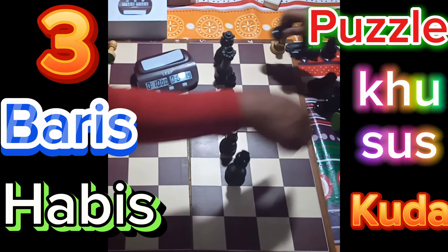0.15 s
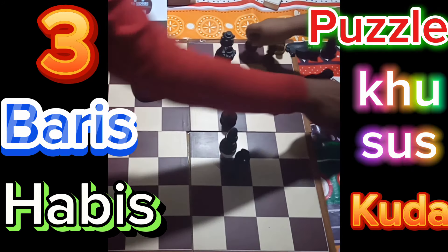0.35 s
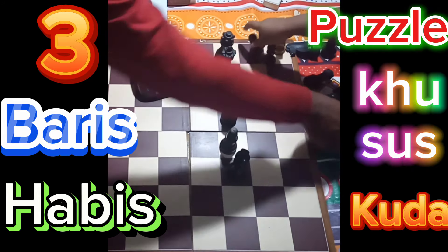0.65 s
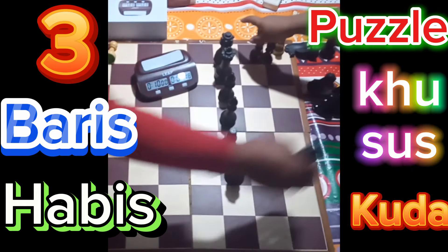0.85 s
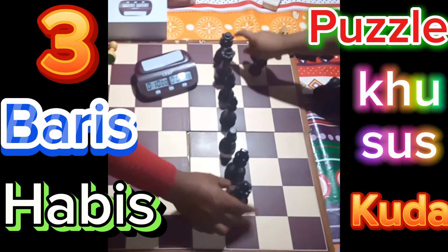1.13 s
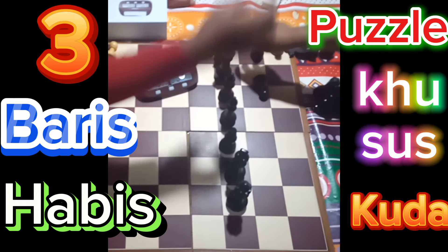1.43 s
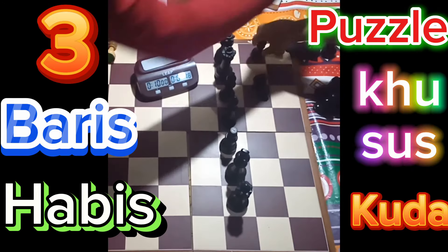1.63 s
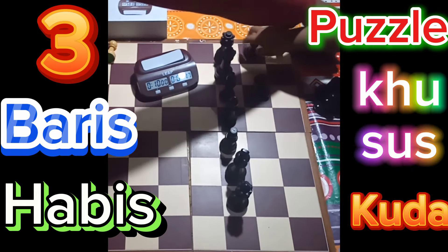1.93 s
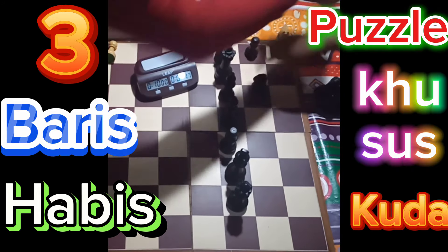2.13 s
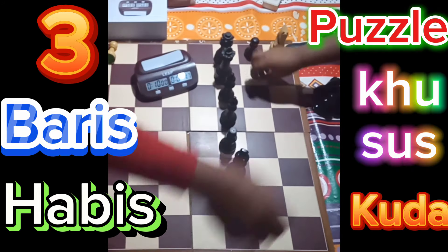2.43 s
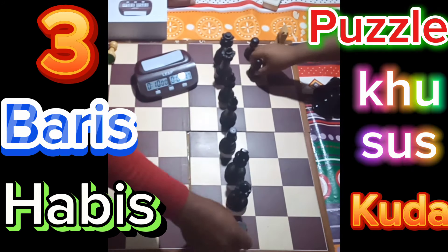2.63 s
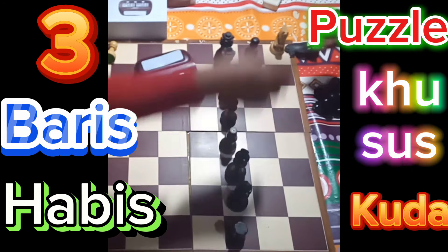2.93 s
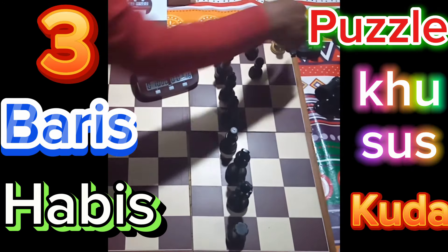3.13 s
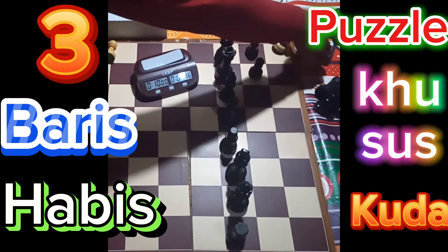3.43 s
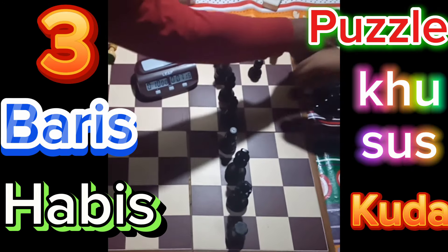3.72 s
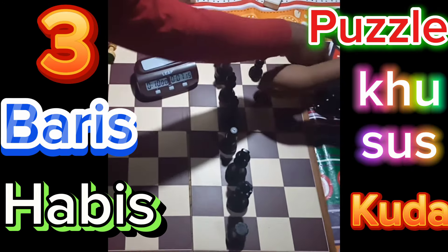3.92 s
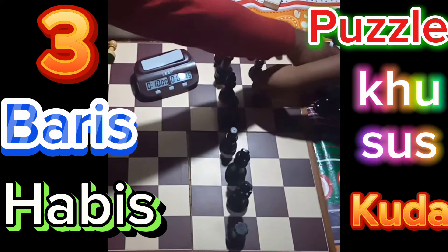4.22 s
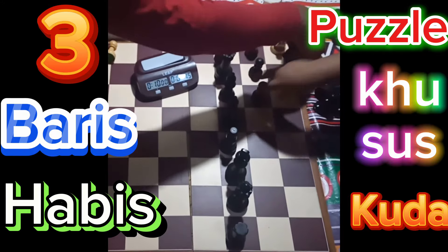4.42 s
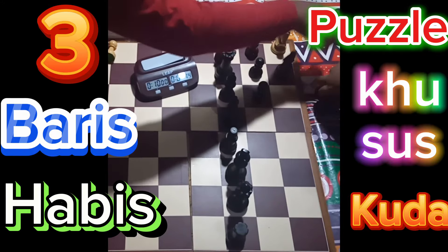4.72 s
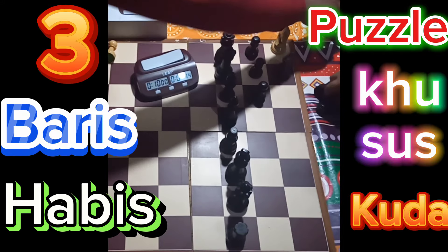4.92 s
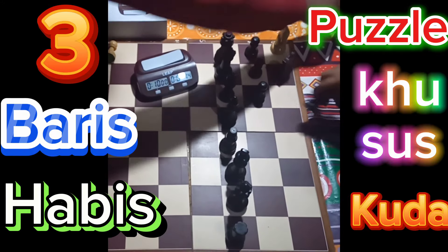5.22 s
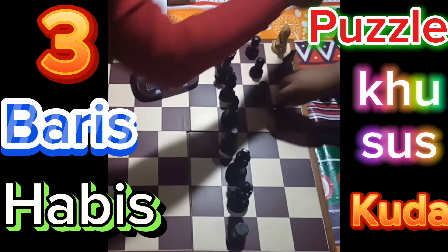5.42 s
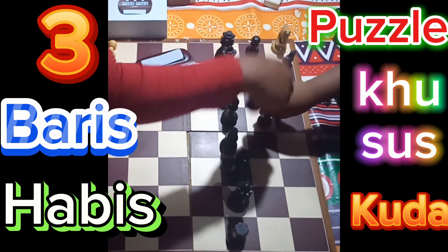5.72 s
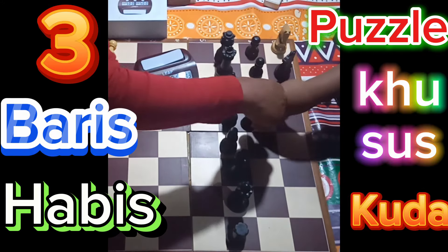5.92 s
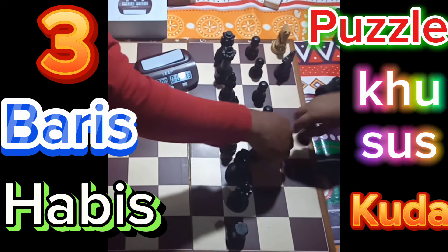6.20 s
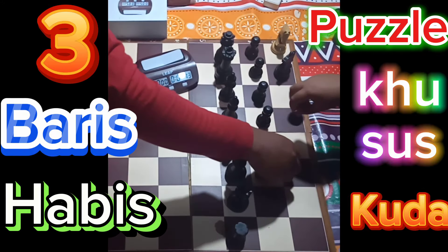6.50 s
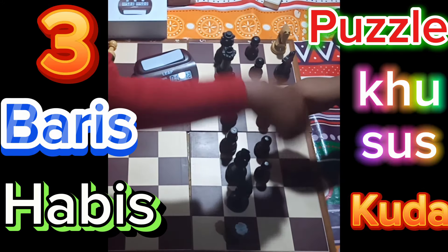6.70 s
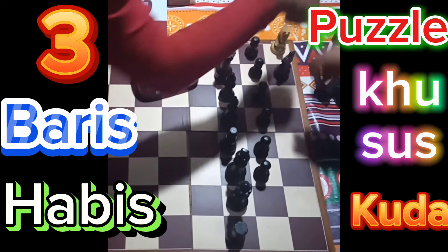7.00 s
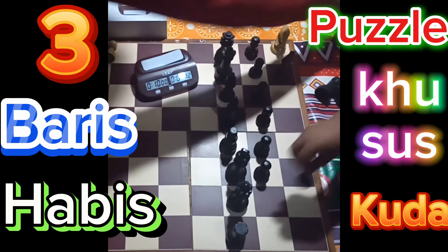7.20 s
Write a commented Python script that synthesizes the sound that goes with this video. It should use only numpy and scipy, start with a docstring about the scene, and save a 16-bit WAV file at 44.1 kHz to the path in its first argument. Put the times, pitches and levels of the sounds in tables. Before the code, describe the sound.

A rapid game of chess in a small room: hard wooden knocks with bright cracks, bunches of lighter taps, and pieces clicking together. The loudest blows clip the close microphone. Grainy rubbing of sleeves and sliding pieces slips between. Late on, a piece wobbles quickly to a stop, then only a few soft knocks and a longer brush remain, above faint cricket chirps and thin hiss.

```python
"""From the start, wooden chess pieces are set down on a board in quick turns, the first with a low thud of the
table. Knocks and clicks are ringing wood plus a noisy crack, each answered by a small room; the hardest blows
clip. A cricket trills faintly all along in falling chirps, over steady noise and the thin high hiss of another
insect. From half a second on, sleeves and sliding pieces brush past as grainy noise. After five seconds a piece
rocks to rest; then come a few softer knocks and, near the end, the longest brush."""
import sys
import numpy as np
from scipy import signal
from scipy.fft import rfft, irfft, next_fast_len
from scipy.io import wavfile
from scipy.ndimage import uniform_filter1d

SR = 44100
rng = np.random.default_rng(int(sys.argv[2]) if len(sys.argv) > 2 else 0)


def store_wav(level_fs):
    """Save 16-bit WAV to argv[1]."""
    pcm = np.round(np.clip(np.atleast_2d(level_fs), -1, 1) * 32767)
    wavfile.write(sys.argv[1], SR, pcm.T.astype(np.int16))


N = 324135


def amp(db):
    """Turn decibels into an amplitude factor."""
    return 10 ** (np.asarray(db) / 20)


def unit(x):
    """Scale a sound to rms 1."""
    return x / np.sqrt(np.mean(x ** 2) + 1e-20)


def along(points, hz):
    """Read a curve of (Hz, value) points, joined by straight lines on a log frequency axis."""
    point_hz, values = np.transpose(points)
    return np.interp(np.log(hz + 1), np.log(point_hz + 1), values)


def filtered(x, response):
    """Multiply the spectrum of x by a function of frequency."""
    size = next_fast_len(len(x) + SR // 4)
    gains = response(np.fft.rfftfreq(size, 1 / SR))
    return irfft(rfft(x, size) * gains, size)[:len(x)]


def noise(spectrum, size):
    """Make random noise with a given colour and rms 1."""
    return unit(filtered(rng.standard_normal(size), lambda hz: amp(along(spectrum, hz))))


def coloured(x, points, size=8192):
    """Colour a sound with a minimum-phase filter, so that nothing sounds before the blow."""
    cepstrum = irfft(np.log(amp(along(points, np.fft.rfftfreq(size, 1 / SR)))))
    # folding the cepstrum onto positive times makes the filter causal
    cepstrum[1:size // 2] *= 2
    cepstrum[size // 2 + 1:] = 0
    return irfft(rfft(x, size) * np.exp(rfft(cepstrum)))[:len(x)]


def add(track, start_s, sound):
    """Mix a sound into the track from a given second on."""
    i = int(np.clip(round(start_s * SR), 0, len(track)))
    track[i:i + len(sound)] += sound[:len(track) - i]


# What the walls hear of the board. Each row: frequency in Hz, colour in dB.
TOWARD_WALLS = [(200, -4), (650, -7), (1300, -9), (3000, -7), (8000, -5.5)]
# Pieces set down on the board; one dropped flat starts at once, one rolled into contact rises slowly.
# Each row: start in seconds, level at the pitch in dB before snap and room, pitch in Hz,
# snap of the rim in dB against that level, rise time constant in seconds, room answer in dB.
KNOCKS = [(.026,-19.5,754,-17,.0002,1), (.0327,-17,1287,-20,0.00037,-6.5), (.1858,-48,890,-25,0.00033,0),
          (.497,-37.5,595,-14,0.0027,1.5), (.7059,-17.5,890,-30,0.00044,-1.5),
          (1.0927,-11,1030,-22,0.00049,-1.5), (1.2399,-9.5,734,-26,0.00056,-0.5),
          (1.4241,-28.5,660,-22,.0003,8.5), (1.4324,-11.5,1570,-16,0.00013,0),
          (1.991,-44,650,-4.5,.003,-12), (2.002,-41.5,840,-24,0.0011,-18),
          (2.0768,-34.5,970,-9.5,.0004,-0.5), (2.2006,-28.5,960,-10.5,0.00028,-3.5),
          (2.246,-35.5,970,-12,.0003,2), (2.2923,-22.5,627,-24,0.0017,-1), (2.3229,-29,1090,-7,0.00035,4),
          (2.353,-30,960,-11,0.0015,-4), (2.6286,-26,575,-34,0.00036,-15),
          (2.6403,-11.5,1490,-6.5,0.00032,0), (3.4057,-39.5,870,-7,0.0026,1.5),
          (3.794,-12.5,1320,-13,0.00046,-5), (3.814,-20.5,693,-21,0.0018,1.5),
          (3.8622,-27.5,704,-15,.0015,6), (3.8828,-21.5,1080,-14,0.00044,-3.5),
          (3.905,-24.5,1080,-11.5,0.00033,-2), (3.939,-30.5,770,-17,.0016,-12),
          (4.0098,-25,875,-11,0.00067,-1.5), (4.1165,-45,586,-10,.003,-4),
          (4.1517,-38.5,890,-10.5,.0003,5.5), (4.21,-40,700,-14,0.00028,2),
          (4.2142,-22.5,786,-15,0.00034,-2.5), (4.6091,-12.5,1168,-25.5,0.00034,-2.5),
          (4.76,-35.5,635,-17,0.002,-6), (4.9648,-21.5,930,-25.5,0.00035,0), (5.098,-37,560,-10,0.001,-5),
          (5.153,-45,1390,-7,0.00032,1), (5.191,-46.5,1190,6.5,0.00045,0), (6.281,-29,790,-18,0.00033,1),
          (6.54,-38,490,-23,.0016,2), (6.5735,-45,520,-28,.0015,-15), (6.864,-44.5,433,-23,0.0004,-9)]
# One piece clicks against another. Each row: start in seconds, level in dB as for the knocks, pitch in Hz.
CLICKS = [(.0095, -35.5, 4100), (.0687, -41.5, 4800), (.527, -50, 5500), (.626, -46, 2360),
          (1.134, -39.5, 2870), (2.513, -41, 4500), (2.537, -53, 4880), (3.323, -47.5, 3400),
          (3.787, -27.5, 3860), (3.7941, -16, 4230), (3.814, -38, 6000), (4.8398, -48.5, 2580),
          (5.062, -41, 2080), (5.069, -39, 7700), (5.127, -44, 5400), (5.134, -46, 7600),
          (5.166, -43.5, 3280), (5.826, -45.5, 3140), (5.835, -48.5, 2620)]


def pieces():
    """Knocks, clicks and rocking all ring the same wood; every contact has its own room answer."""
    track = np.zeros(N)
    click_snap_db, click_rise_s, click_room_db = -10.5, 0.00023, -2.5
    clicks = [(*row, click_snap_db, click_rise_s, click_room_db) for row in CLICKS]
    for start_s, db, pitch_hz, snap_db, rise_s, room_db in [*KNOCKS, *clicks, *rocking(count=6)]:
        levels = contact_colour(db, pitch_hz, snap_db)
        blow = clack(pitch_hz, rise_s, levels, ring_db=7, ring_t60=0.03,
                     crack_db=23.0, crack_t60=0.0047, crowd_db=19.5, crowd_t60=0.032, scatter_db=1.0)
        add(track, start_s, blow)
        thrown = coloured(blow, TOWARD_WALLS)
        answer = signal.fftconvolve(thrown, room(wall_s=0.0138, near_share=0.72))
        same_energy = answer * np.linalg.norm(thrown) / np.linalg.norm(answer)
        add(track, start_s, amp(room_db) * same_energy)
    return track


def rocking(count):
    """A released piece rocks on its base, each swing shorter, softer and duller than the last."""
    start_s, first_gap_s, shrink = 5.1991, 0.0838, 0.87
    first_db, loss_db = -32.5, 3  # level, and its loss at each contact
    first_hz, sag = 975, 0.88  # pitch, and its factor at each contact
    snap_db, rise_s, room_db = -18, 0.0018, -7
    contacts = []
    for k in range(count):
        elapsed_s = first_gap_s * (1 - shrink ** k) / (1 - shrink)  # sum of the shrinking gaps
        contacts.append((start_s + elapsed_s, first_db - loss_db * k, first_hz * sag ** k,
                         snap_db, rise_s, room_db))
    return contacts


# Edges of the bands in which a blow takes its colour. Each entry: frequency in Hz.
BAND_EDGES = [100, 450, 900, 1700, 2700, 4200, 9000, 16000]
BAND_CENTRES = np.sqrt(np.multiply(BAND_EDGES[1:], BAND_EDGES[:-1]))
# Hard contact of the rim. Each row: frequency in Hz, colour in dB.
SNAP = [(210, -18), (640, -5), (1240, -11), (2140, -4.5), (3400, -3.5), (6100, -7.5), (12000, -14)]


def contact_colour(db, pitch_hz, snap_db):
    """A blow is strongest in a woody hump around its pitch, plus the snap of the rim: dB in each band."""
    bass_slope, treble_slope = 2.96, 4.51  # falls of the hump, as powers of frequency
    below = (pitch_hz / BAND_CENTRES) ** bass_slope
    above = (BAND_CENTRES / pitch_hz) ** treble_slope
    hump = 2 / (below + above)
    snap = amp(snap_db + along(SNAP, BAND_CENTRES)) ** 2
    return db + 10 * np.log10(hump + snap)


def attack_levels(x, size=2048):
    """Find the level in dB of each band over the first 8 ms of a blow."""
    n = SR // 125
    fade = np.minimum(1, np.linspace(4, 0, n))  # fades over the last quarter
    power = abs(rfft(x[:n] * fade, size)) ** 2 * 2 / (size * n)
    band_power = np.add.reduceat(power, np.array(BAND_EDGES) * size // SR)[:-1]
    return 10 * np.log10(band_power + 1e-12)


# Resonances of board and pieces, before the blow is coloured.
# Each row: frequency in Hz, strength in dB, time to fall by 60 dB in seconds.
WOOD = [(178.5, -9.5, 0.032), (320.5, -3.5, 0.032), (523, -14.5, 0.023), (615, 0, 0.023),
        (698, -2.5, 0.032), (828, -10, 0.044), (960, -3, 0.016), (1083, -7, 0.079), (1120, 2, 0.0099),
        (1408, 2.5, 0.034), (1650, -30, 0.19), (1740, -3, 0.052), (2038, -2, 0.019), (2323, -10.5, 0.043),
        (3080, -20, 0.11), (4000, -8, 0.022)]
# The crack of contact and the crowd of small resonances after it, before the blow is coloured.
# Each row: frequency in Hz, colour in dB.
CRACK = [(50, -16.5), (150, -19.5), (400, -7), (1200, 4.5), (2200, -7), (3200, -7.5), (4100, -12.5),
         (4800, -15.5), (6400, -15), (7300, -13.5), (8600, -25.5), (10500, -37.5), (16000, -42.5)]


def clack(ring_hz, rise_s, levels, ring_db, ring_t60, crack_db, crack_t60, crowd_db, crowd_t60, scatter_db):
    """The spot that is struck favours one resonance; the hardness of the contact sets the colour."""
    t = np.arange(SR // 10) / SR
    hz, db, t60 = np.transpose(WOOD)[:, :, None]
    strength = amp(db + scatter_db * rng.standard_normal(hz.shape)) * rng.choice([-1, 1], hz.shape)
    detune = 1 + 0.021 * rng.standard_normal(hz.shape)  # no two blows ring quite alike
    ring = np.sum(strength * np.sin(2 * np.pi * hz * detune * t) * amp(-60 * t / t60), axis=0)
    favoured_db = ring_db + along([row[:2] for row in WOOD], ring_hz)
    ring += amp(favoured_db - 60 * t / ring_t60) * np.sin(2 * np.pi * ring_hz * t)
    crack = amp(crack_db - 60 * t / crack_t60)
    crowd = amp(crowd_db - 60 * t / crowd_t60)
    blow = ring + coloured(rng.standard_normal(len(t)) * (crack + crowd), CRACK)
    # a rocking base rolls into contact, a dropped one snaps
    blow *= 1 - np.exp(-t / max(rise_s, 1 / SR))
    # a small board radiates no deep bass
    blow = signal.sosfilt(signal.butter(2, 145, "high", fs=SR, output="sos"), blow)
    for _ in range(2):  # twice, because neighbouring bands overlap
        correction_db = levels - attack_levels(blow)
        blow = coloured(blow, np.column_stack([BAND_CENTRES, correction_db]))
    return blow


# How long the room rings. Each row: frequency in Hz, time to fall by 60 dB in seconds.
ROOM = [(150, 0.2), (500, 0.15), (1100, 0.19), (3000, 0.17), (8000, 0.18), (15000, 0.15)]


def room(wall_s, near_share):
    """Fading noise of energy 1: weak scatter from nearby things, then the walls arrive."""
    hz, t, cells = signal.stft(rng.standard_normal(SR // 4), SR, nperseg=256)
    decay = amp(-60 * t / along(ROOM, hz)[:, None])
    tail = signal.istft(cells * decay, SR, nperseg=256)[1]
    t = np.arange(len(tail)) / SR
    tail *= np.interp(t, [0.003, 0.007, wall_s, wall_s + 0.0032], [0, near_share, near_share, 1])
    return tail / np.linalg.norm(tail)


def thud():
    """The hand comes down with the first piece: one low, quickly damped swing of the table top."""
    start_s, level_db, pitch_hz, t60 = 0.024, -28, 146, 0.11
    track, t = np.zeros(N), np.arange(SR // 4) / SR
    add(track, start_s, amp(level_db - 60 * t / t60) * np.sin(2 * np.pi * pitch_hz * t))
    return track


# Brushing sleeves and sliding pieces.
# Each row: start in seconds, length in seconds, rms level in dB before the swell shapes it.
BRUSHES = [(0.505, 0.16, -44.5), (1.717, 0.3, -62), (2.316, 0.036, -37), (3.004, 0.35, -58.5),
           (3.309, 0.11, -42.5), (4.002, 0.015, -50), (4.18, .087, -47.5), (4.819, 0.065, -47.5),
           (5.054, 0.13, -45.5), (7.172, 0.53, -49.5)]
# The sound of the rubbing. Each row: frequency in Hz, colour in dB.
CLOTH = [(880, -30), (1500, -6), (2300, -9.5), (3810, -7), (4500, -14.5), (7540, -5), (10200, -15),
         (14500, -18), (16000, -10)]


def brushes():
    """Short swells of friction that catches and slips in tiny grains, bunched into uneven scrapes."""
    track = np.zeros(N)
    grain_db, scrape_db = 4.0, 2.5  # how strongly the level wavers, rms
    for start_s, length_s, db in BRUSHES:
        n = int(length_s * SR)
        # random curves smoothed over a few samples or many
        fine, coarse = (unit(uniform_filter1d(rng.standard_normal(n), size=k)) for k in (60, 500))
        grain = amp(grain_db * fine + scrape_db * coarse)
        swell = np.sin(np.linspace(0, np.pi, n))
        add(track, start_s, amp(db) * swell * unit(grain * noise(CLOTH, n)))
    return track


# Cricket trills. Each row: middle of the first chirp in seconds, middle of the last chirp in seconds,
# approximate chirps a second.
TRILLS = [(.02, .754, 16.3), (.81, 1.445, 17.3), (1.846, 3.275, 18.2), (3.335, 4.522, 17.7),
          (4.585, 5.744, 17.2), (5.803, 6.272, 17), (6.686, 7.34, 18.4)]


def cricket(start_hz, end_hz, stroke_s, level_db, overtone_db, echo_db):
    """Each wing stroke slows, so its note falls; the insect sits still, so every chirp gets the same echo."""
    track = np.zeros(N)
    n = int(stroke_s * SR)
    phase = 2 * np.pi * np.cumsum(np.linspace(start_hz, end_hz, n)) / SR
    for first_s, last_s, rate in TRILLS:
        count = round((last_s - first_s) * rate) + 1
        for middle_s in np.linspace(first_s, last_s, count):
            wing = phase * rng.normal(1, 0.0054)  # the pitch varies a little
            chirp = np.hanning(n) * (np.sin(wing) + amp(overtone_db) * np.sin(2 * wing))
            add(track, middle_s - stroke_s / 2, chirp * amp(rng.normal(0, 0.27)))
    echo = signal.fftconvolve(track, room(wall_s=0.012, near_share=1.0))[:N]
    return amp(level_db) * unit(unit(track) + amp(echo_db) * unit(echo))


# Room noise. Each row: frequency in Hz, colour in dB.
AIR = [(12, -58), (20, -26), (27, -5), (123, 4), (607, -4), (698, -5.5), (976, -5.5), (1960, -10),
       (2260, -9), (3250, -10.5), (3740, -11), (4540, -19.5), (7730, -21.5), (9670, -26.5), (16000, -25.5)]
# Thin high hiss of a second, distant insect. Each row: frequency in Hz, colour in dB.
HISS = [(5500, -30), (6900, -6), (7500, -3.5), (7900, -1), (8400, -11), (9500, -21)]


def air():
    """Steady random noise of the room, with the thin high hiss of a second insect."""
    air_db, hiss_db = -51, -64  # rms levels
    return amp(air_db) * noise(AIR, N) + amp(hiss_db) * noise(HISS, N)


def scene():
    """Add up the pieces, the table, the brushing, the cricket and the room."""
    insect = cricket(start_hz=3935, end_hz=3461, stroke_s=0.032, level_db=-59.0, overtone_db=-17, echo_db=-3.5)
    return (pieces() + thud() + brushes() + insect + air())[None]


def record(dry):
    """Loud blows overload the microphone and clip, then pull the gain down for a moment; the band ends steeply."""
    ceiling = np.where(dry[0] > 0, 1.0, 0.9)  # the negative side clips earlier
    clipped = dry[0] / (1 + abs(dry[0] / ceiling) ** 12) ** (1 / 12)
    # the gain follows past power, weighted by a memory that rises and then fades
    t = np.arange(SR) / SR
    attack_s, release_s = 0.2, 0.085  # time constants
    memory = (1 - np.exp(-t / attack_s)) ** 2 * np.exp(-t / release_s)
    load = abs(signal.fftconvolve(clipped ** 2, memory / memory.sum())[:N])
    knee_db = -15.5  # remembered rms level at which the gain is 3 dB down
    gain = 1 / np.sqrt(1 + load / amp(knee_db) ** 2)
    top_hz = 15900
    return filtered(clipped * gain, lambda hz: 1 / (1 + (hz / top_hz) ** 120))[None]


dry = scene()
out = record(dry)
store_wav(out)
```